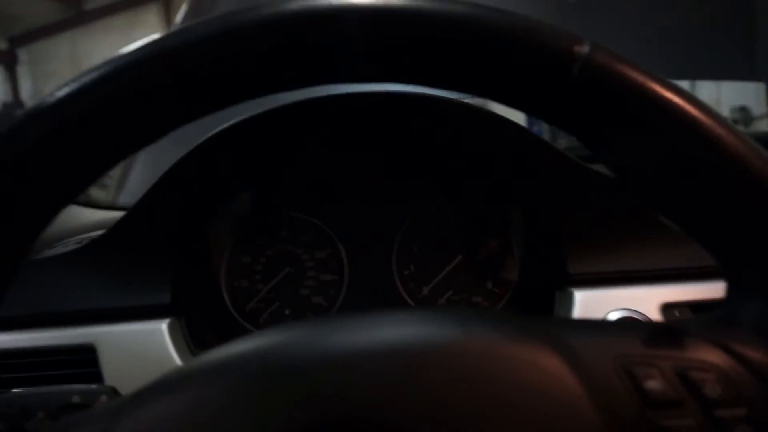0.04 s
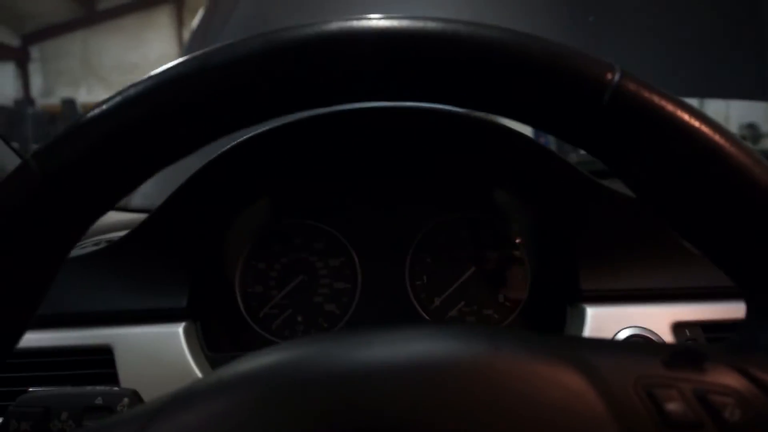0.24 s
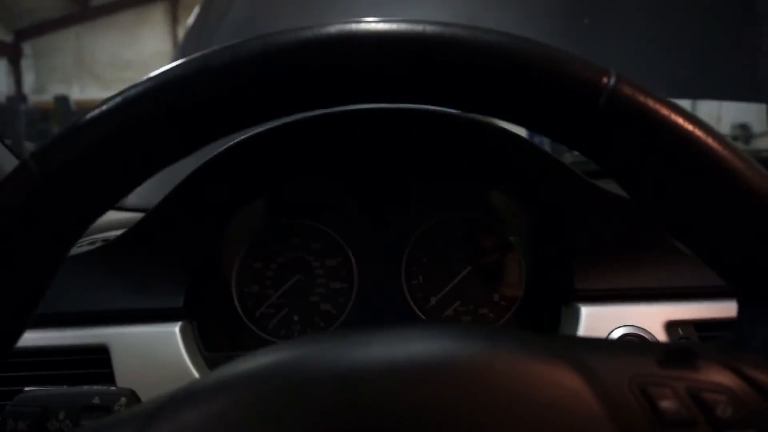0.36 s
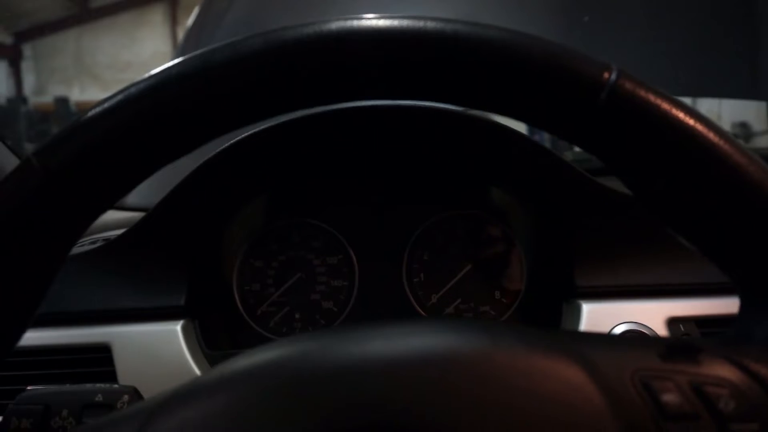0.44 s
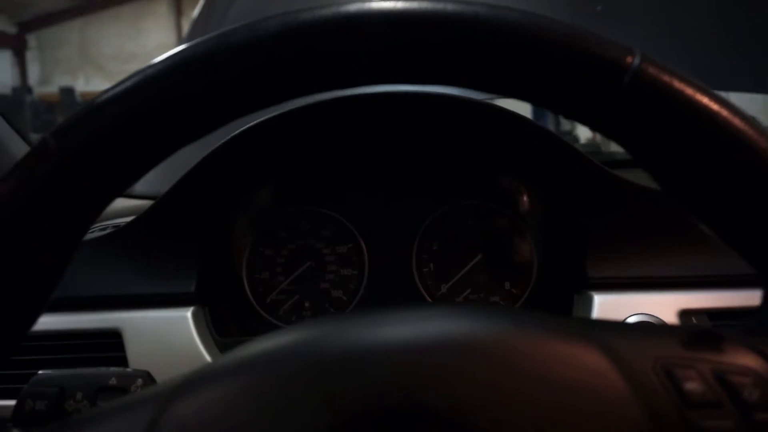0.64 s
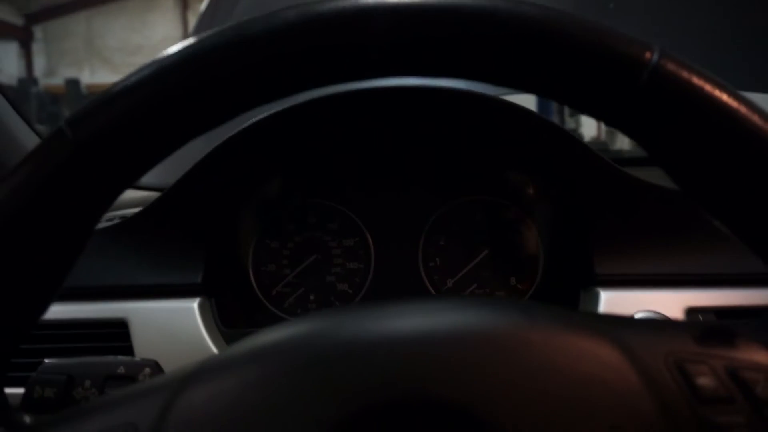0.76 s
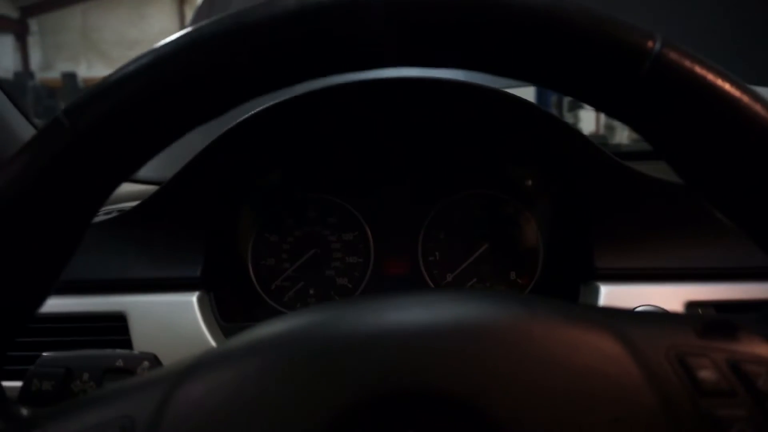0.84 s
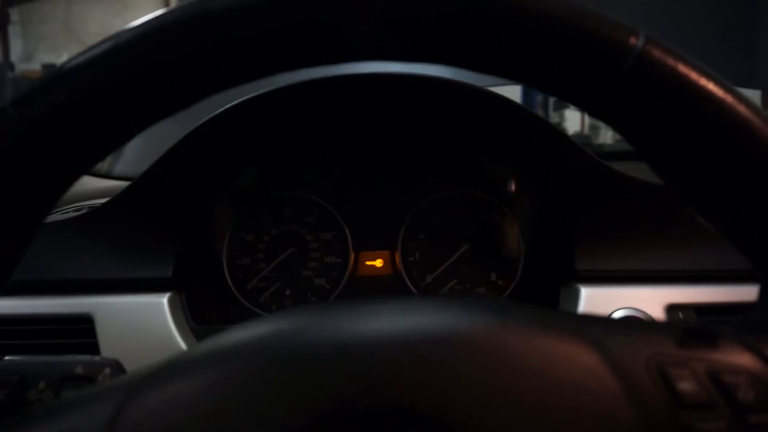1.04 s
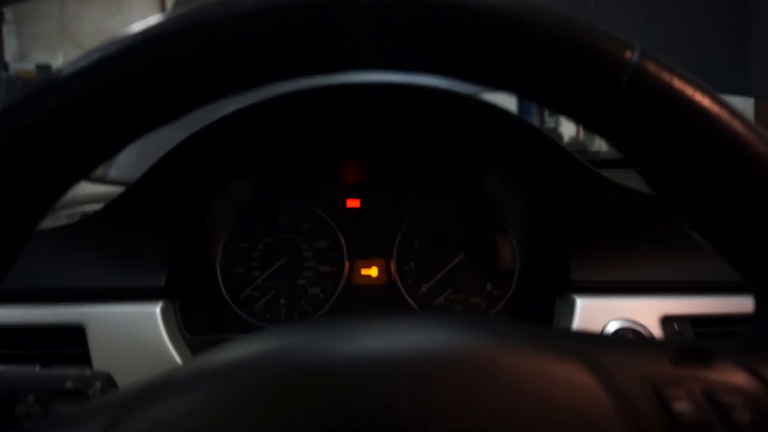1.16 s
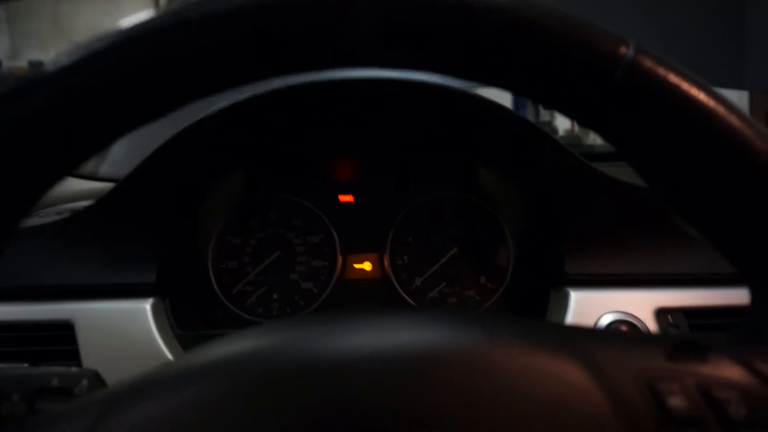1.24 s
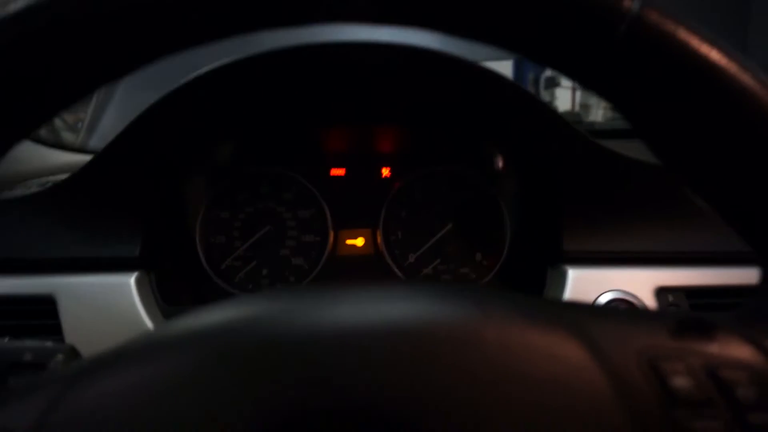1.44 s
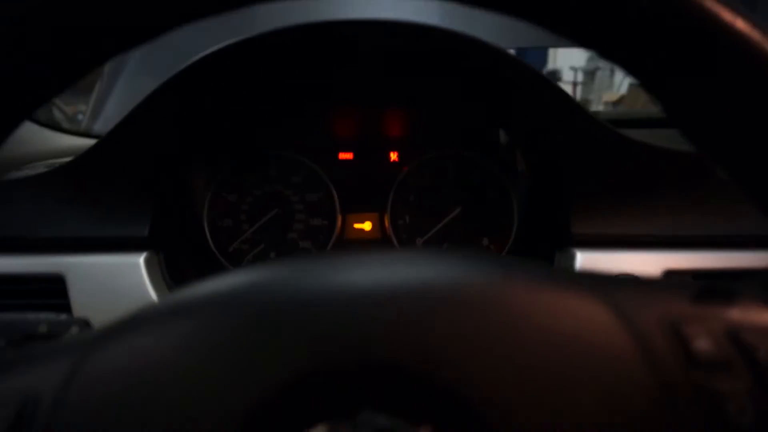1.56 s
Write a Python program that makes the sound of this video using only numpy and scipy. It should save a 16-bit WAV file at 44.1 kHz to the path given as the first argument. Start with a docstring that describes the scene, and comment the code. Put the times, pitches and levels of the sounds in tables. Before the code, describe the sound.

Key fob inserted into a parked car's ignition slot, close up in a small, dry cabin. Soft hiss alone until a knock at 0.23 seconds; a brief scrape and hard clack at 0.4, with bright metal ticks to 0.48. Lighter rattles and faint sliding to 0.73, crisp latching clicks at 0.85 and 0.93 with dull thumps, low handling rumble, then soft taps around 1.17, 1.37 and 1.58.

```python
"""A key fob is pushed into the ignition slot of a parked car, heard from the driver's seat.
A soft hiss lies under everything from the start. Then the fob knocks, slides and latches (filtered noise
bursts plus ringing tones); the plastic dashboard rings, small metal parts tick and rattle, and the padded
cabin answers each contact briefly. From then on a low rumble of handling (noise) comes and goes, with dull
thumps (single swelling tones). More knocks follow, and light ones go on almost to the end."""
import sys
import numpy as np
from scipy import signal
from scipy.io import wavfile

SR = 44100
rng = np.random.default_rng(int(sys.argv[2]) if len(sys.argv) > 2 else 0)


def unload_wav(signal):
    """Save mono or channel-first audio to the path in sys.argv[1] as 16-bit WAV at rate SR, clipped to [-1, 1]."""
    wavfile.write(
        sys.argv[1],
        SR,
        np.round(np.clip(np.atleast_2d(signal).T, -1, 1) * 32767).astype(np.int16),
    )


N = 70560  # 1.6 s of samples

# In all tables t60 is the time a sound takes to fall by 60 dB. Levels of the layers add up in dB.
# knocks of fob and latch: t/s, pitch of the struck spot f/Hz, its level/dB, top edge f/Hz,
# then level/dB of boom, body, knock, clack, click, treble
KNOCKS = [(.2345, 320.7, -16.5, 12100, -38.5, -21, -14, -25, -10, -28),
          (.3968, 1200, -15.5, 11700, -38.5, -20.5, -13.5, -31.5, -24, -34),
          (.4003, 681, -9.5, 8900, -51, -31.5, -22, -26, -31, -29),
          (.436, 667, -31, 15000, -36.5, -34.5, -19.5, -31.5, -28, -37),
          (.476, 240, -29.5, 12000, -69, -33, -31, -33, -22, -26.5),
          (.5905, 685, -28.5, 9000, -52, -59, -35, -40.5, -52, -44),
          (.6153, 1217, -22.5, 7000, -33, -56, -26, -23, -40.5, -24.5),
          (.714, 650, -29, 9000, -38.5, -33, -35.5, -30, -32.5, -47),
          (.8482, 1580, -26, 11500, -24, -32.5, -15.5, -14, -13, -26.5),
          (.879, 2830, -27, 8000, -37, -28.5, -32, -31, -24.5, -37),
          (.9332, 4600, -17.5, 19000, -39, -17.5, -23.5, -19.5, -19, -21),
          (.9372, 282.5, -17, 6000, -43.5, -25.5, -26.5, -21, -19.5, -27),
          (1.168, 456, -26.5, 9000, -38.5, -38, -35.5, -36, -36, -47),
          (1.367, 232, -26, 5000, -69, -42.5, -33, -55, -27, -50),
          (1.381, 651, -34.5, 9000, -45.5, -38, -47, -54, -46, -48),
          (1.5815, 256, -26, 9000, -51, -41, -36, -42, -33.5, -65)]
# centres of those six ranges: f/Hz
KNOCK_CENTRES = [110, 300, 670, 1400, 3400, 9000]
# light metal ticks: t/s, pitch of the struck part f/Hz, its level/dB, top edge f/Hz,
# then level/dB of clack, click, treble
TICKS = [(.2837, 9530, -34, 13000, -28.5, -31, -23.5), (.3275, 2730, -33, 11000, -37.5, -38.5, -35),
         (.4338, 6750, -32, 18000, -19, -24.5, -20), (.4408, 6810, -15.5, 16000, -34, -17, -16),
         (.4454, 3720, -18, 15000, -25, -27, -15.5), (.4772, 3700, -26, 12000, -39, -33, -26),
         (.5496, 4060, -42, 11100, -32.5, -32.5, -36), (.599, 3900, -45, 9000, -67, -29.5, -52),
         (.6155, 4960, -31, 6500, -49, -26, -38), (.6414, 4100, -47, 10000, -29.5, -31, -25),
         (.6457, 7950, -35, 11300, -29.5, -23.5, -16), (.6693, 4330, -30, 10000, -37, -30, -24.5),
         (.7065, 2830, -35, 11000, -37, -41, -37), (.9284, 1555, -17.5, 16000, -14, -25.5, -24),
         (1.3655, 3920, -34, 10500, -32, -24, -53), (1.3724, 3320, -28, 10900, -31, -29.5, -25.5),
         (1.433, 4020, -35, 11000, -35.5, -45.5, -38), (1.5703, 11900, -42, 12900, -53, -54, -37)]
# centres of those three ranges: f/Hz
TICK_CENTRES = [1430, 3730, 9100]
# ringing of dashboard and cabin air: f/Hz, level/dB, t60/s
DASH_MODES = [(100.4, 4, 0.18), (123.5, 8.5, 0.2), (187.7, -7, 0.27), (228.6, 0, .25), (264, -19.5, .16),
              (331.6, -1.5, 0.11), (388.7, 2.5, 0.075), (463.4, -5.5, 0.072), (505, -44, 0.048),
              (667.6, -4, 0.1), (718, -8, 0.055), (907, -11, 0.1), (1227, -20.5, 0.026), (1413, -17, 0.16)]
# ringing of key and ring: f/Hz, level/dB, t60/s
METAL_MODES = [(2772, -4, 0.077), (3930, -6, 0.034), (4030, -4, 0.053), (4687, -6.5, 0.071),
               (6380, -5, 0.08), (7360, -17, 0.14), (8300, -13, .06), (9700, -27, .06), (10400, -5.5, 0.02),
               (7350, -18, 0.08), (10980, -11, 0.053), (12900, -15, .06), (14600, -15, 0.045)]
# ring of the struck spot: f/Hz, t60/s
SPOT_T60 = [(250, 0.16), (700, 0.068), (1500, 0.046), (4000, 0.021), (10000, 0.013)]
# tone colour of a knock's crack: f/Hz, level per band/dB
KNOCK_COLOUR = [(70, -9.5), (130, -13), (250, 0), (450, -2.5), (700, -5.5), (1000, -8), (1600, -6.5),
                (2200, -20.5), (2900, -12), (4200, -22.5), (5500, -15.5), (8000, -15), (11000, -14.5),
                (15000, -15)]
# tone colour of a tick's crack: f/Hz, level per band/dB
TICK_COLOUR = [(500, -12), (1000, -6.5), (1800, -15), (2800, -11.5), (3800, -9.5), (5200, -15.5),
               (7000, -20), (10000, -7.5), (12500, -39), (15000, -22)]
# length of the first crack, before each layer scales it: f/Hz, t60/s
CRACK_T60 = [(100, 0.02), (600, 0.034), (1500, 0.012), (3500, 0.013), (12000, 0.036)]
# length of the cabin tail (anything under 0.001 s counts as 0.001 s): f/Hz, t60/s
TAIL_T60 = [(100, 1.07), (280, 0.1), (700, 0.22), (2000, -0.0759), (6000, 0.32), (14000, 0.12)]
# cabin tail against the first crack, before each layer's offset: f/Hz, level/dB
TAIL_SHARE = [(100, 38), (300, -15.5), (700, -5.5), (2000, 0), (6000, -10.5), (14000, -8)]
# dull thumps as hand and fob press on the dashboard: t/s, f/Hz, level/dB
THUMPS = [(.445, 33.2, -39), (0.654, 339, -32), (.735, 107, -32), (0.768, 110, -29.5), (0.855, 115.7, -22),
          (.885, 40, -26), (0.947, 283, -30), (0.981, 48.6, -26.5), (1.035, 118, -32), (1.2, 122, -30.5),
          (1.438, 218, -31), (1.49, 213, -53)]
# slides of the fob before it seats: start t/s, end t/s, level at the end/dB
SLIDES = [(0.379, 0.403, -31), (0.56, 0.602, -41), (0.65, 0.733, -47.5), (0.827, 0.848, -31)]
# tone colour of the sliding: f/Hz, relative level per band/dB
SLIDE_COLOUR = [(150, -4), (350, 11), (700, 2), (1500, 4.5), (4000, -1), (9000, -3), (15000, -10)]
# tone colour of the hiss: f/Hz, level per band/dB
HISS_COLOUR = [(30, -62), (60, -71), (120, -59), (230, -56.5), (400, -61), (800, -56), (1600, -54),
               (3000, -60), (6000, -66), (10000, -64.5), (15000, -72.5)]
# slow rise and fall of the hiss: t/s, level/dB
HISS_LEVEL = [(0, -1.9), (.18, -0.57), (.35, 2.1), (.7, 2.2), (1.05, -0.79), (1.3, 2.3), (1.6, 2.2)]
# tone colour of the handling rumble: f/Hz, level per band/dB
RUMBLE_COLOUR = [(25, -29.5), (35, -18), (50, -18), (70, -15), (115, -6.5), (160, -9), (240, 0.5),
                 (400, -2.5), (800, -30), (2000, -48)]
# rise and fall of the rumble: t/s, level/dB
RUMBLE_LEVEL = [(0, -64), (.18, -65), (.3, -50), (.46, -40), (.56, -52), (0.659, -36.5), (.76, -51.5),
                (.82, -53), (.9, -81), (1.0, -49), (1.12, -55), (1.21, -48), (1.28, -55.5), (1.45, -50.5),
                (1.54, -64), (1.6, -85)]
# stereo width of contacts and tones: f/Hz, side against mid level/dB
WIDTH = [(60, -25), (125, -18), (250, -12), (500, -12.5), (1000, -10), (2000, -9), (4000, -11.3),
         (8000, -13.4), (14000, -18)]
# stereo lean of contacts and tones: f/Hz, left minus right level/dB
BALANCE = [(120, .1), (280, 1.7), (550, .1), (1000, -2.4), (1700, -2.4), (3000, -1), (8000, -.4)]
# stereo width of the noises, widest around 3 kHz, narrow in the bass and at the very top:
# f/Hz, side against mid level/dB
AIR_WIDTH = [(60, -33), (130, -30), (290, -14), (640, -7.5), (1400, -7.5), (3100, -4), (6800, -8),
             (15000, -22)]
# stereo lean of the noises: f/Hz, left minus right level/dB
AIR_BALANCE = [(60, -5), (130, 2), (290, -0.5), (640, 2.5), (1410, 3.5), (3100, 2), (6820, -0.5),
               (15000, 0.5)]

KNOCK_DB, DASH_DB, TICK_DB, METAL_DB = -2, -2, -5, -11.5  # layer levels
TOP_STEEPNESS = 10  # power of the roll-off above a contact's top edge
ATTACK_S, REFLECTION_S = 0.0004, 0.0045  # rise of a crack; delay until the cabin tail starts
CRACK_SPREAD_DB, TAIL_SPREAD_DB = -4, 3  # reflections are wider than the direct crack
THUMP_ATTACK_S, THUMP_T60_S = 0.008, 0.14
SLIDE_RISE_DB, SLIDE_GRAINS_PER_S = 10.5, 4000
CUTOFF_HZ = 15750
TIME = np.arange(N) / SR  # seconds

# 24 neighbouring bands, each 0.4 octave wide: (centre in Hz, filter)
EDGES = 22 * 2 ** (np.arange(25) * 0.4)
BANDS = [(np.sqrt(low * high), signal.butter(2, [low, high], "band", fs=SR, output="sos"))
         for low, high in zip(EDGES, EDGES[1:])]


def from_db(db):
    """Turn decibels into a gain."""
    return 10 ** (np.asarray(db) / 20)


def at_hz(points, hz):
    """Read a table at a frequency, with equal steps per octave."""
    f, value = np.transpose(points)
    return np.interp(np.log(hz), np.log(f), value)


def unit(x):
    """Scale the last axis to energy 1."""
    return x / np.sqrt(np.sum(x ** 2, axis=-1, keepdims=True) + 1e-20)


def dying(t, t60):
    """Fade away exponentially from t = 0, silent before it."""
    return np.exp(-np.log(1000) * np.maximum(t, 0) / max(t60, 1e-3)) * (t >= 0)


def stereo(mid, side, hz, width=WIDTH, balance=BALANCE):
    """Make left and right, with the width and lean of this frequency."""
    side = from_db(at_hz(width, hz)) * side
    lean = from_db(at_hz(balance, hz) / 2)
    return np.array([(mid + side) * lean, (mid - side) / lean])


def add(out, start_s, sound):
    """Mix a sound in at its start time."""
    i = max(int(start_s * SR), 0)
    out[:, i:i + sound.shape[1]] += sound[:, :N - i]


def strength(row, centres, hz):
    """Gain with which one contact drives a frequency; it fades above the contact's top edge."""
    top_edge, levels = row[3], row[4:]
    gain = from_db(np.interp(np.log(hz), np.log(centres), levels))
    return gain / np.hypot(1, (hz / top_edge) ** TOP_STEEPNESS)


def fob():
    """The fob knocks in its slot with sharp cracks and sets the dashboard ringing."""
    knocks = cracks(KNOCKS, KNOCK_CENTRES, KNOCK_COLOUR, crack_scale=1.03, tail_db=-1.0, lowest_hz=60)
    dashboard = ringing(KNOCKS, KNOCK_CENTRES, DASH_MODES, lag_s=0.0025, scatter_db=3.4)
    return from_db(KNOCK_DB) * knocks + from_db(DASH_DB) * dashboard


def metal():
    """Small metal parts tick with short cracks and ring briefly."""
    ticks = cracks(TICKS, TICK_CENTRES, TICK_COLOUR, crack_scale=0.72, tail_db=-0.5, lowest_hz=450)
    ring = ringing(TICKS, TICK_CENTRES, METAL_MODES, lag_s=0.0003, scatter_db=2)
    return from_db(TICK_DB) * ticks + from_db(METAL_DB) * ring


def cracks(rows, centres, colour, crack_scale, tail_db, lowest_hz):
    """Noise stands for countless short modes: a sharp crack, then cabin reflections dying band by band."""
    out, t = np.zeros((2, N)), TIME[:SR // 3]
    # axes: contact, alternate bands, mid and side, time
    white = rng.standard_normal((len(rows), 2, 2, len(t)))
    sounds = np.zeros((2, len(rows), len(t)))
    for k, (hz, sos) in enumerate(BANDS):
        if hz < lowest_hz:
            continue
        crack = unit(dying(t, crack_scale * at_hz(CRACK_T60, hz)) * (1 - np.exp(-t / ATTACK_S)))
        tail = unit(dying(t - REFLECTION_S, at_hz(TAIL_T60, hz)))
        tail = tail * from_db(at_hz(TAIL_SHARE, hz) + tail_db)
        mid_shape = np.hypot(crack, tail)
        side_shape = np.hypot(crack * from_db(CRACK_SPREAD_DB), tail * from_db(TAIL_SPREAD_DB))
        shapes = np.array([mid_shape, side_shape])
        sizes = np.linalg.norm(shapes, axis=1, keepdims=True) / np.linalg.norm(mid_shape)
        burst = sizes * unit(signal.sosfilt(sos, white[:, k % 2] * shapes))
        burst = burst * np.sqrt(SR / 100)  # mid gets the energy of level 1 held for 10 ms
        gains = np.array([strength(row, centres, hz) for row in rows]) * from_db(at_hz(colour, hz))
        mid, side = burst[:, 0], burst[:, 1]
        side = side - mid * np.sum(unit(mid) * unit(side), axis=1, keepdims=True)  # width without a lean
        sounds += stereo(mid, side, hz) * gains[:, None]
    for k, row in enumerate(rows):
        add(out, row[0], sounds[:, k])
    return out


def ringing(rows, centres, modes, lag_s, scatter_db):
    """Each contact sets a body's modes (its own tones) ringing, with random differences in strength."""
    out, t = np.zeros((2, N)), TIME[:SR // 2]
    chance = rng.standard_normal((len(rows), len(modes)))
    rings = []
    for k, (hz, db, t60) in enumerate(modes):
        phase = 2 * np.pi * hz * t
        mid = (-1) ** k * np.sin(phase)  # every other mode starts the opposite way
        rings.append(stereo(mid, np.cos(phase), hz) * dying(t, t60) * from_db(db))
    mode_hz = np.array(modes)[:, 0]
    for row, luck in zip(rows, chance):
        gains = strength(row, centres, mode_hz) * from_db(scatter_db * luck)
        add(out, row[0] + lag_s, np.tensordot(gains, np.array(rings), 1))
    return out


def spots(rows, build_cycles):
    """Each contact also rings at the pitch of the very spot it strikes."""
    out = np.zeros((2, N))
    for start_s, hz, db, *_ in rows:
        add(out, start_s, from_db(db) * tone(hz, build_cycles / hz, at_hz(SPOT_T60, hz)))
    return out


def tone(hz, attack_s, t60):
    """One resonance that swells and dies, in stereo."""
    t = TIME[:SR // 2]
    phase = 2 * np.pi * hz * t
    swell = 1 - np.exp(-(t / attack_s) ** 2)
    return stereo(np.sin(phase), np.cos(phase), hz) * dying(t, t60) * swell


def thumps():
    """Soft pushes that each stir only one low resonance of dashboard or cabin."""
    out = np.zeros((2, N))
    for start_s, hz, db in THUMPS:
        add(out, start_s, from_db(db) * tone(hz, THUMP_ATTACK_S, THUMP_T60_S))
    return out


def sliding():
    """Grainy friction noise that swells towards the end of each slide, then stops."""
    level = np.zeros(N)
    for start_s, end_s, db in SLIDES:
        remaining = np.clip((end_s - TIME) / (end_s - start_s), 0, 1)
        active = (TIME > start_s) * (TIME < end_s)
        level += from_db(db - SLIDE_RISE_DB * remaining) * active
    grains = (rng.random(N) < SLIDE_GRAINS_PER_S / SR) + 0.064  # a little smooth noise between grains
    colour = [(40, -42)] + list(SLIDE_COLOUR)  # weak in the deep bass
    return level * unit(noise(colour, grains)) * np.sqrt(N)


def background():
    """Soft hiss with a gently drifting level, and the uneven rumble of handling."""
    hiss = from_db(np.interp(TIME, *np.transpose(HISS_LEVEL))) * noise(HISS_COLOUR)
    rumble = from_db(np.interp(TIME, *np.transpose(RUMBLE_LEVEL))) * noise(RUMBLE_COLOUR)
    return hiss + rumble


def noise(colour, grain=1):
    """Stereo noise built band by band, smooth or broken into grains."""
    white = rng.standard_normal((2, 2, N)) * grain
    out = np.zeros((2, N))
    for k, (hz, sos) in enumerate(BANDS):
        # a quarter second of run-up lets the filter settle before the part that is kept
        with_run_up = np.tile(white[k % 2], 2)[:, N - SR // 4:]
        mid, side = unit(signal.sosfilt(sos, with_run_up)[:, -N:]) * np.sqrt(N)
        out += from_db(at_hz(colour, hz)) * stereo(mid, side, hz, AIR_WIDTH, AIR_BALANCE)
    return out


def scene():
    """Add up everything in the cabin."""
    knocks = fob() + spots(KNOCKS, build_cycles=1.24)
    ticks = metal() + spots(TICKS, build_cycles=3.6)
    return knocks + ticks + thumps() + sliding() + background()


def record(dry):
    """Cut the top of the treble steeply."""
    low_pass = signal.ellip(10, 0.1, 90, CUTOFF_HZ, fs=SR, output="sos")
    return signal.sosfilt(low_pass, dry)


dry = scene()
out = record(dry)
unload_wav(out)
```